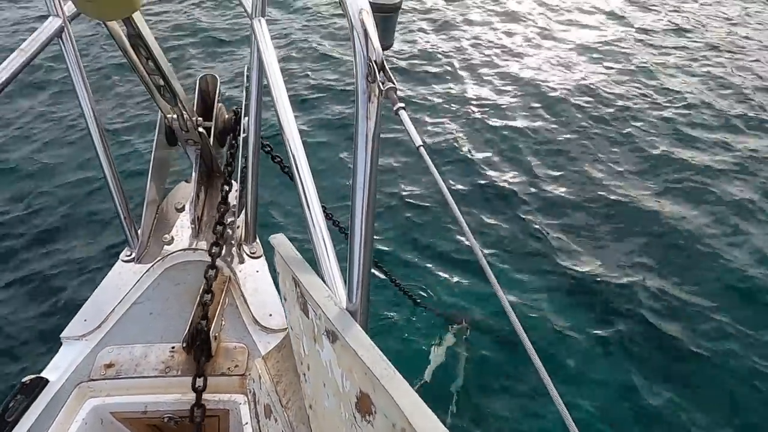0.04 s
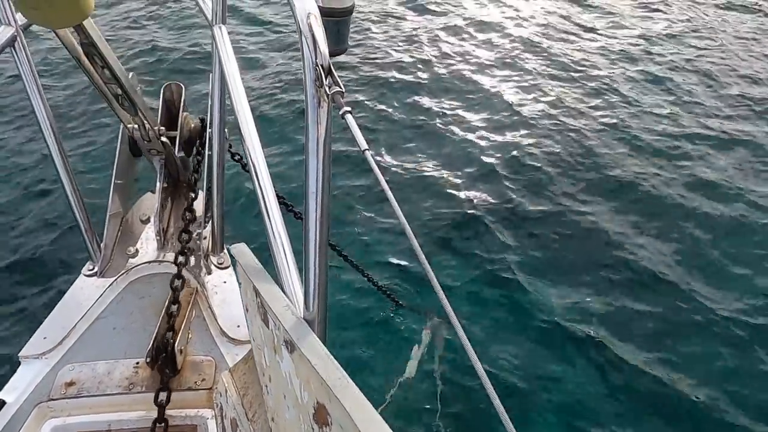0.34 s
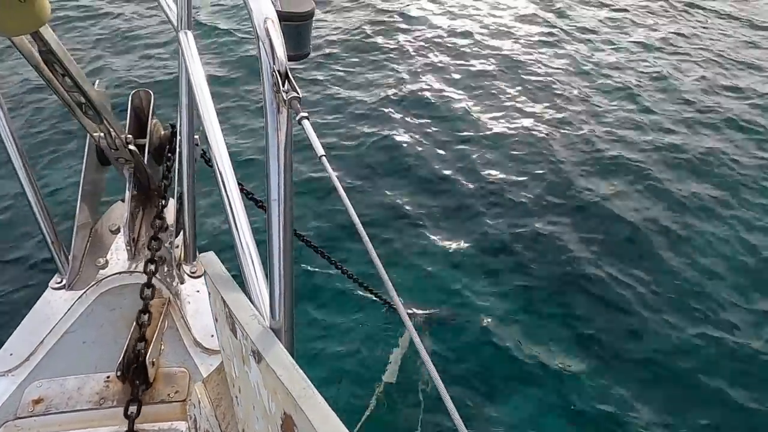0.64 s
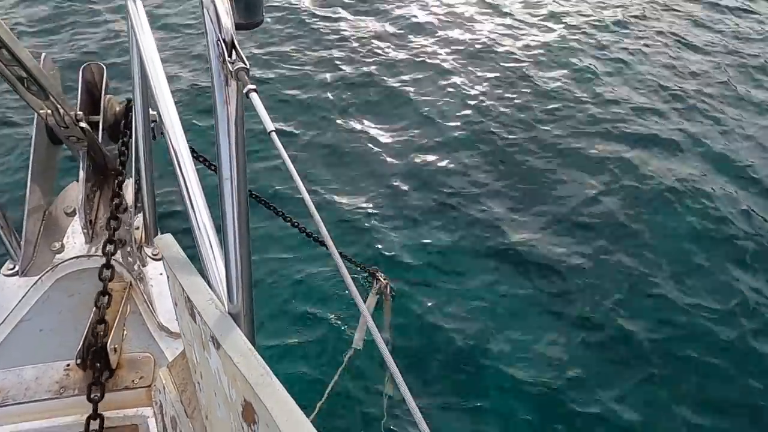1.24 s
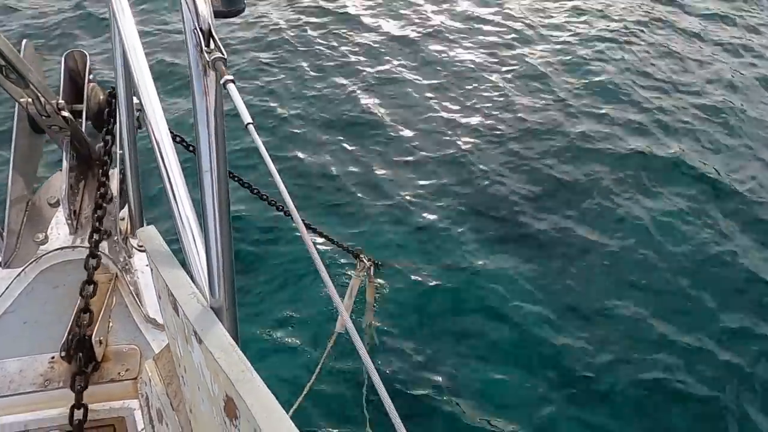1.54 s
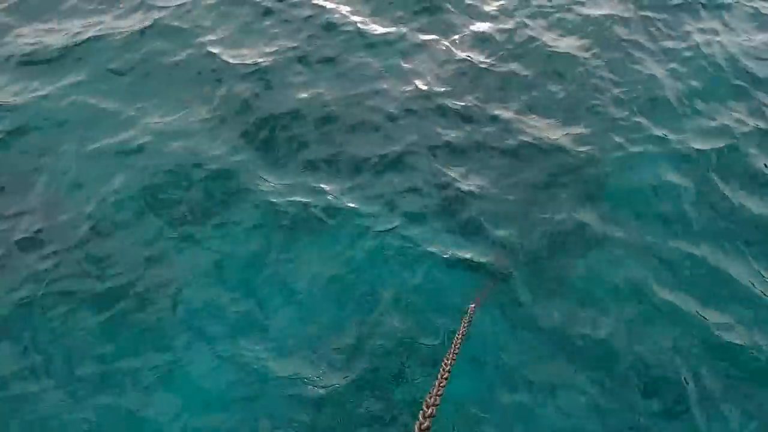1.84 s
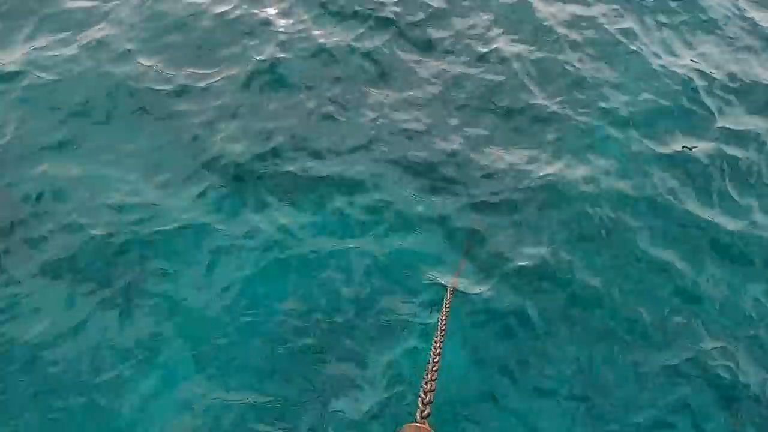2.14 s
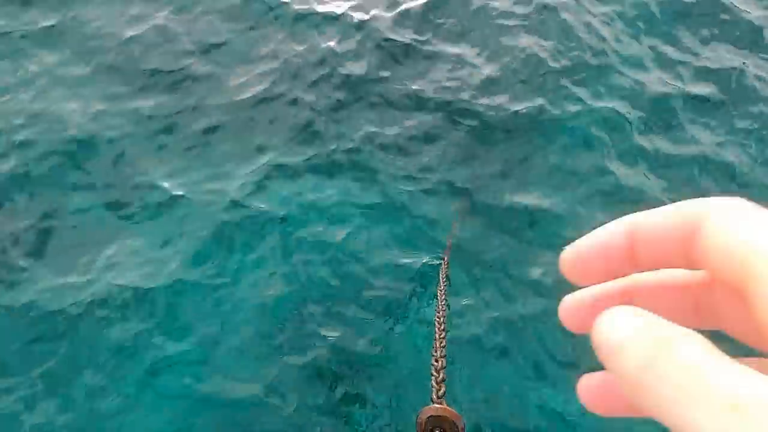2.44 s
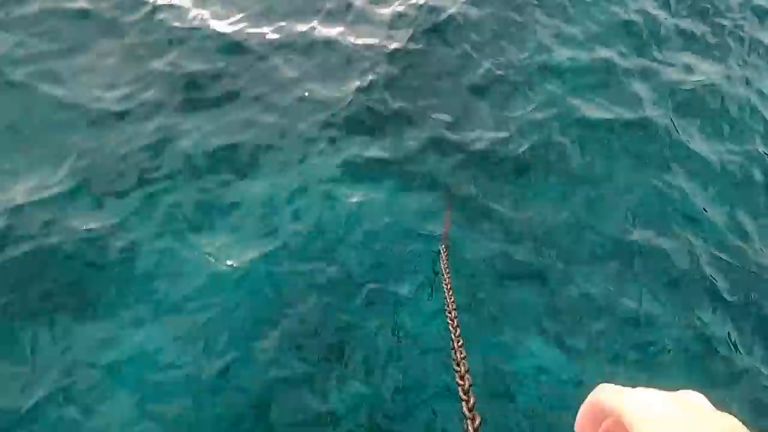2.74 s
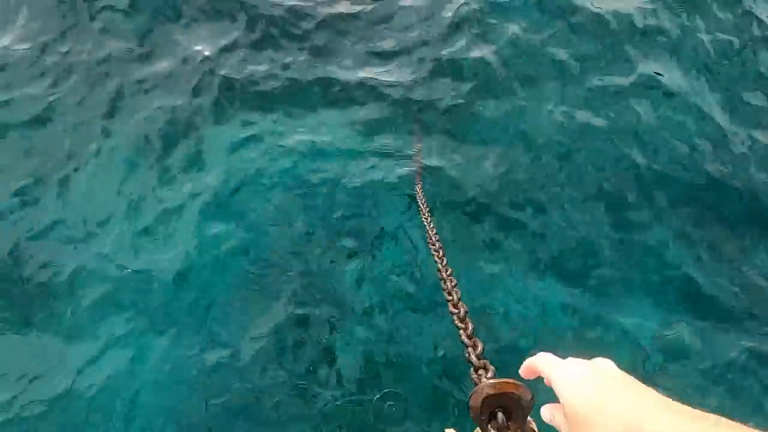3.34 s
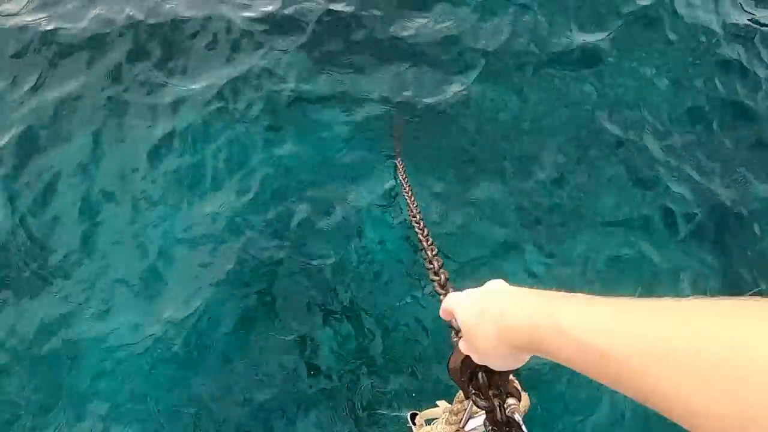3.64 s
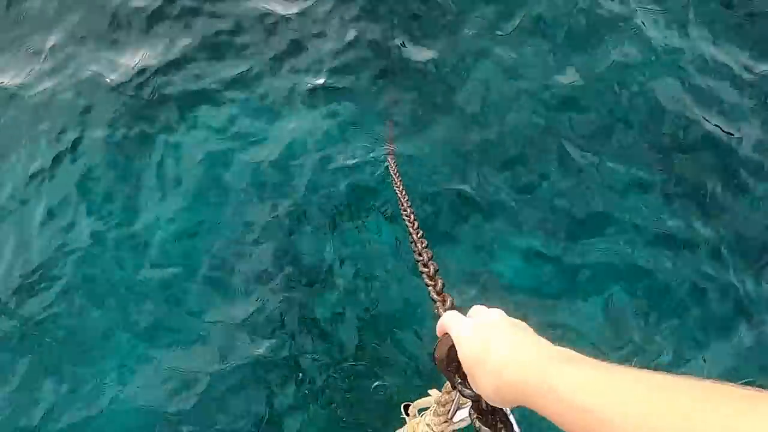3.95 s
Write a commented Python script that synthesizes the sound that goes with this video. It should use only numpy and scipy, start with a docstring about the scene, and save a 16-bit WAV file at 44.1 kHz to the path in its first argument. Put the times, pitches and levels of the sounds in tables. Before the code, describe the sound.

Anchor chain clatters through an electric windlass close by on a boat's bow, about six clinks a second, with knocks, deck thuds and rattling over the motor's hum. From about 1 second it fades out. At 1.8 seconds a click cuts to low wind gusts on the microphone, strongest near 2.4 and 3.5 seconds. Underneath, water softly laps and drips until 4 seconds, with a few faint chain tinkles.

```python
"""On a boat's bow, close to an electric windlass hauling anchor chain. Each link clinks on the roller,
knocks in the chain wheel and thuds through the deck, over the motor's hum and a loose rattle.
From about 1 s the hauling fades out. At 1.845 s a second scene cuts in with a click: wind buffets the
microphone while water laps and drips at the bow and the hanging chain tinkles faintly."""
import sys
import numpy as np
from scipy import signal
from scipy.fft import rfft, irfft
from scipy.io import wavfile

SR = 44100
rng = np.random.default_rng(int(sys.argv[2]) if len(sys.argv) > 2 else 0)


def file_out(sig):
    """Save sig as 16-bit WAV at sys.argv[1]."""
    # one column per channel
    cols = np.atleast_2d(sig).T
    # limit, then scale
    lim = np.clip(cols, -1, 1)
    pcm = np.round(lim * 32767).astype(np.int16)
    wavfile.write(sys.argv[1], SR, pcm)


N = 176400
FADE_FROM_S, CUT_S = 1.027, 1.845

# Wind on the microphone. Each row: time in seconds, deep rumble level in dB, mean flutter level in dB.
GUSTS = [(1.85, -36, -44), (1.88, -27.5, -44.5), (1.96, -26.5, -49), (2.009, -42.5, -48),
         (2.14, -38.5, -52), (2.19, -44, -57), (2.241, -33, -32.5), (2.26, -35.5, -60), (2.38, -22, -26.5),
         (2.47, -26.5, -34.5), (2.63, -34.5, -34), (2.66, -28, -36), (2.88, -30.5, -48.5),
         (2.93, -28, -34.5), (3.11, -34, -59), (3.17, -29.5, -41.5), (3.33, -30, -27), (3.49, -21, -28.5),
         (3.55, -26, -36), (3.65, -38.5, -67), (3.879, -29, -33.5), (3.9, -36, -56), (4.0, -41.5, -67)]
# Colours of the noises and blows. Each row: frequency in Hz, relative spectral level in dB.
WIND_DEEP_COLOUR = [(15, -12.5), (30, -2), (55, -0.5), (100, -3.5), (140, -11.5), (200, -14.5), (800, -84),
                    (15000, -130)]
WIND_FLUTTER_COLOUR = [(70, -11), (130, 0), (190, -2.5), (280, -12), (420, -21.5), (700, -32),
                       (1500, -66.5), (9000, -88)]
WAVELET_COLOUR = [(180, -12.5), (300, -0.5), (515, -1), (841, -9), (1020, -8.5), (2970, -23), (6840, -37.5),
                  (8600, -42.5), (11000, -63), (15000, -75)]
SPLASH_COLOUR = [(400, -13), (1000, 7), (1900, 1.5), (3000, -1), (5000, -12.5), (8500, -21), (11000, -30.5),
                 (15000, -50)]
SLAP_COLOUR = [(200, -11.5), (700, 13), (1300, 8.5), (2500, -8), (5000, -15.5), (9000, -45), (14000, -70)]
TICK_COLOUR = [(1500, -1), (3500, 1.5), (6000, 2.5), (8300, -3), (9500, -12), (14000, -30)]
HULL_COLOUR = [(20, -24), (40, -3.5), (70, -4.5), (95, -3.5), (135, -2), (190, -12), (280, -12.5),
               (500, -23), (3000, -82), (15000, -130)]
RATTLE_COLOUR = [(200, -9.5), (320, 1), (390, -14), (450, 1), (515, -2), (600, 2.5), (720, 4), (880, -3.5),
                 (1200, 1), (1550, -6.5), (2100, -7), (2800, -9), (3600, -12), (4700, -27), (6000, -19),
                 (7600, -28.5), (8700, -29), (9400, -41.5), (10300, -33), (13000, -45), (15500, -56)]
THUD_COLOUR = [(60, 2), (250, 1), (600, 0.5), (900, -5), (1300, -2), (2200, -24), (5000, -29),
               (9000, -60.5), (15000, -86.5)]
KNOCK_COLOUR = [(100, -2), (400, -2), (1200, 3.5), (2000, 2.5), (2900, 0), (4700, -5), (6200, -22.5),
                (7700, -22.5), (8800, -22), (9500, -41.5), (12500, -44), (15500, -51.5)]
CRACK_COLOUR = [(1000, -17), (2600, -7.5), (3500, -4), (4900, -1), (6200, -14), (7700, -21.5), (8800, -24),
                (9500, -30), (12000, -39.5), (15500, -47.5)]
SCATTER_COLOUR = [(100, -33), (1000, -31.5), (4000, -2.5), (8000, 9), (13000, 15.5)]

# Splashes at the bow. Each row: time of the peak in seconds, half length in seconds, level in dB.
BOW_SPLASHES = [(2.073, 0.11, -56.5), (2.527, 0.12, -56), (2.837, 0.05, -57), (3.219, 0.043, -47),
                (3.283, 0.017, -62), (3.587, 0.14, -59), (3.842, .03, -62)]
# Drips and bubbles. Each row: start in seconds, pitch in Hz, level in dB, t60 in seconds.
WATER_DRIPS = [(1.948, 1690, -37.5, 0.042), (2.178, 787, -39, 0.16), (2.232, 318, -28.5, 0.039),
               (2.287, 1940, -48.5, 0.058), (3.195, 1845, -41.5, 0.068), (3.25, 1626, -45, 0.055),
               (3.43, 1580, -46, 0.062)]
# Water slapping and ticking at the bow. Each row: start in seconds, level in dB.
BOW_SLAPS = [(2.232, -49.5), (2.304, -37), (2.37, -39.5), (2.386, -42), (3.236, -39), (3.486, -38)]
WATER_TICKS = [(2.309, -59), (2.369, -62.5), (2.513, -52), (2.521, -54), (2.828, -60), (3.102, -49.5),
               (3.11, -59), (3.416, -64), (3.432, -65), (3.788, -62)]
# Hanging links touching. Each row: start in seconds, level in dB, ring pitch in Hz.
CHAIN_TINKLES = [(1.983, -59.5, 4230), (2.52, -51.5, 5030), (2.715, -64, 3900), (2.727, -69, 5700),
                 (2.83, -60, 4360), (2.868, -67, 4100)]

# Modes of the parts that ring. Each row: frequency in Hz, relative level in dB, t60 in seconds.
SLACK_CHAIN_MODES = [(3450, -9.5, 0.094), (3740, -0.5, 0.058), (4320, -9, .08), (4720, -4, 0.11),
                     (5394, -11, 0.05), (6260, -16, .07), (7030, -8, 0.088), (8800, -13.5, .07),
                     (9600, -17, .06), (12600, -29, .06)]
DECK_MODES = [(151, 4, 0.15), (256.8, -4.5, 0.18), (310.7, -7, 0.18), (362, -0.5, 0.036), (423, 0.5, 0.14),
              (473, -6, 0.17), (566.7, -1.5, 0.094), (747, -9, 0.082)]
HOUSING_MODES = [(572, -1, .14), (714, -3, .12), (936, -3, .16), (990, -4, .1), (1162, 0, .14),
                 (1308, -2, .09), (1534, -3, .11), (1794, -5, .09), (2135, -6, .1), (2416, -6, .1),
                 (3430, -5, .14), (4205, -3, .22), (4666, -9, .13), (5395, -13, .16)]
WHEEL_MODES = [(3180, -4, .1), (4160, 5.5, 0.057), (4360, -11.5, .1), (4640, -6.5, 0.071),
               (5330, -7.5, 0.058), (7060, -12, 0.061), (8802, -28.5, 0.063)]
# Modes of one link. Each row: ratio to the ring pitch, relative level in dB, t60 in seconds.
LINK_MODES = [(.79, -13, 0.035), (0.943, -3.5, 0.071), (0.999, 2, 0.062), (1.062, -4, 0.05),
              (1.18, -4, .04), (1.31, -8, .03), (1.45, -14, .025), (1.66, -20, .025)]
# The chain's blows on deck and chain wheel. Each row: start in seconds, relative level in dB.
DECK_THUDS = [(0.076, -19), (0.202, -20.5), (.236, -21), (0.391, -18.5), (.545, -16), (.697, -19.5),
              (0.852, -17.5), (1.008, -22.5), (1.156, -21), (1.238, -19.5), (1.29, -24), (1.317, -24.5),
              (1.452, -19.5), (1.479, -19.5), (1.613, -22)]
WHEEL_PINGS = [(.083, -27), (.245, -25.5), (.398, -38.5), (.543, -34), (0.699, -26), (.856, -51.5),
               (1.013, -45), (1.171, -39), (1.334, -23.5), (1.486, -30.5)]
WHEEL_KNOCKS = [(.047, -17.5), (0.078, -27), (.130, -25.5), (0.202, -17.5), (.232, -32), (0.287, -21.5),
                (0.36, -17.5), (0.44, -23), (0.514, -21.5), (0.539, -26), (0.598, -17.5), (0.671, -22),
                (.696, -21.5), (0.751, -20), (.826, -19.5), (.903, -22), (0.921, -24), (.978, -19.5),
                (1.056, -20.5), (1.131, -21), (1.210, -19), (1.289, -21.5), (1.316, -23.5), (1.373, -20.5),
                (1.45, -20.5), (1.533, -23), (1.609, -21.5), (1.688, -22), (1.706, -26), (1.764, -19.5)]
# Links striking the bow roller. Each row: start in seconds, relative level in dB, ring pitch in Hz,
# level of the crack in dB relative to that blow.
ROLLER_CLINKS = [(0.02, -20.5, 3320, -12.5), (0.024, -10, 3460, -11), (0.172, -17, 3630, -9.5),
                 (0.317, -12, 3425, -16), (.324, -12.5, 3370, -10.5), (0.469, -14.5, 3700, -9.5),
                 (0.484, -15.5, 3840, -2), (0.632, -14.5, 3680, -6.5), (.647, -16, 3713, 0.5),
                 (0.778, -26.5, 3790, 2.5), (0.797, -16.5, 3325, -7), (.941, -19, 3290, -7.5),
                 (0.953, -15, 3300, -1.5), (1.094, -22.5, 3835, -2), (1.107, -15.5, 3660, -1),
                 (1.257, -12.5, 3334, -5.5), (1.409, -10.5, 3390, -4.5), (1.428, -23.5, 4090, -1),
                 (1.563, -21.5, 3770, 5.5), (1.578, -15, 3560, -3), (1.725, -14.5, 3570, -1)]


def undb(db):
    """Decibels to gain."""
    return 10 ** (np.asarray(db) / 20)


def unit(x):
    """Scale to rms 1."""
    return x / np.sqrt(np.mean(x ** 2) + 1e-20)


def noise(colour, size=N):
    """Noise of rms 1 with the given colour."""
    hz, db = np.array(colour, float).T
    f = np.maximum(np.arange(size // 2 + 1) * SR / size, 1)
    gain = undb(np.interp(np.log(f), np.log(hz), db)) * np.minimum(f / hz[0], 1) ** 2
    return unit(irfft(gain * np.exp(2j * np.pi * rng.random(len(f))), size))


def walk(rate):
    """A random curve of rms 1 that turns rate times a second."""
    return unit(np.interp(np.arange(N) * rate / SR, np.arange(N // 20), rng.standard_normal(N // 20)))


def decay(t60, size=12000):
    """Exponential die-away, 60 dB down after t60 seconds."""
    return np.exp(-np.log(1000) * np.arange(size) / SR / t60)


def burst(colour, t60, size=12000):
    """Quickly dying noise of the given colour, starting near rms 1."""
    hz, db = np.array(colour, float).T
    f = np.maximum(np.arange(size // 2 + 1) * SR / size, 1)
    gain = undb(np.interp(np.log(f), np.log(hz), db)) * np.minimum(f / hz[0], 1)
    cepstrum = irfft(np.log(gain))
    cepstrum[size // 2:] = 0  # minimum phase keeps the attack sharp
    envelope = decay(t60, size)
    y = irfft(rfft(rng.standard_normal(size) * envelope) * np.exp(2 * rfft(cepstrum)))
    return y * np.linalg.norm(envelope) / np.linalg.norm(y)


def ring(modes, size=12000):
    """Decaying (Hz, dB, t60) modes that start near rms 1."""
    t = np.arange(size) / SR
    y = sum(rng.choice([-1, 1]) * undb(db) * np.sin(2 * np.pi * hz * t) * decay(t60, size)
            for hz, db, t60 in modes)
    start_rms = np.sqrt(sum(undb(db) ** 2 for _, db, _ in modes) / 2)
    return y * (1 - decay(0.001, size)) / start_rms


def add(out, s, sound):
    """Mix a sound in at s seconds."""
    i = min(max(int(s * SR), 0), len(out))
    out[i:i + len(sound)] += sound[:len(out) - i]


def chatter(body, gap_s, count=4):
    """One blow followed by a few weaker rebounds, about gap_s apart."""
    order = np.arange(count)
    delays = (order + rng.uniform(-0.61, 0.58, count) * (order > 0)) * gap_s
    gains = 0.4 ** order * rng.choice([-1, 1], count)
    out = np.zeros(len(body))
    for s, gain in zip(delays, gains):
        add(out, s, gain * body)
    return out * np.linalg.norm(body) / np.linalg.norm(out)


def detuned(hz, spread):
    """A pitch off by a random fraction."""
    return hz * (1 + spread * rng.standard_normal())


def link_ring(hz):
    """The ring of one link; no two are quite alike."""
    return ring([(detuned(hz * ratio, 0.0089), db, t60) for ratio, db, t60 in LINK_MODES])


def water(t):
    """Down at the waterline, a soft wash of wavelets with splashes, drips, slaps and small ticks."""
    out = noise(WAVELET_COLOUR) * undb(-53.5 + 2.2 * walk(6.05) + 2 * walk(90))
    spray = unit(noise(SPLASH_COLOUR) * undb(3.1 * walk(250)))
    for s, half_s, db in BOW_SPLASHES:
        out += spray * undb(db) * np.exp(-((t - s) / half_s) ** 2)
    for s, hz, db, t60 in WATER_DRIPS:
        add(out, s, undb(db) * ring([(hz, 0, t60)]) * (1 - decay(0.015)))
    for s, db in BOW_SLAPS:
        add(out, s, undb(db) * burst(SLAP_COLOUR, t60=0.06))
    for s, db in WATER_TICKS:
        add(out, s, undb(db) * burst(TICK_COLOUR, t60=0.058))
    return out


def gurgle(start_s=3.185, length_s=0.068, centre_hz=1782, octaves=0.6, count=12):
    """A quick cluster of small bubbles at the bow, each ringing at its own pitch."""
    out = np.zeros(N)
    for when, pitch in rng.random((count, 2)):
        hz = centre_hz * 2 ** (octaves * (pitch - 0.5))
        bubble = ring([(hz, 0, 0.04)]) * (1 - decay(0.0089))
        add(out, start_s + when * length_s, undb(-46) * bubble)
    return out


def tinkles():
    """Links of the hanging chain touch lightly."""
    out = np.zeros(N)
    for s, db, hz in CHAIN_TINKLES:
        add(out, s, undb(db) * link_ring(hz))
    return out


def wind(t):
    """Gusts right on the microphone: a deep rumble and a quicker flutter."""
    s, deep_db, flutter_db = np.array(GUSTS).T
    deep = noise(WIND_DEEP_COLOUR) * undb(np.interp(t, s, deep_db))
    flutter = noise(WIND_FLUTTER_COLOUR) * undb(np.interp(t, s, flutter_db) + 4.85 * walk(40))
    return deep + flutter


def cut_click():
    """A click as the scene changes."""
    out = np.zeros(N)
    add(out, CUT_S, undb(-29.5) * decay(0.04))
    return out


def motor(t, start_hz=145, sag_hz_per_s=4, wobble=0.11, throb_db=5):
    """The loaded motor hums unsteadily over the rumble of the hull; both ease off late in the haul."""
    hz = (start_hz - sag_hz_per_s * t) * (1 + wobble * walk(39.27))
    throb = undb(throb_db * np.clip(walk(30), -2, 1))
    hum = unit(np.sin(2 * np.pi * np.cumsum(hz) / SR) * throb)
    easing = undb(np.interp(t, [1.3, 1.5], [0, -4]))
    return (undb(-28) * hum + undb(-23.5) * noise(HULL_COLOUR)) * easing


def rattle(t, links=8, taps_per_s=2200, settle_s=0.05):
    """Loose links tap the housing and jingle; each knock in the wheel briefly shakes them harder."""
    shaken = np.max([(t > s) * np.exp(-((t - s) / settle_s) ** 2) for s, _ in WHEEL_KNOCKS], axis=0)
    clatter, jingle = np.zeros(N), np.zeros(N)
    for _ in range(links):
        touches = rng.random(N) < taps_per_s / links / SR
        strength = undb(2.5 * np.clip(rng.standard_normal(N), -2, 2))
        taps = touches * strength * rng.choice([-1, 1], N) * (1 + 2.2 * shaken)
        modes = [(detuned(hz, 0.018), db, t60) for hz, db, t60 in SLACK_CHAIN_MODES]
        housing_tap = burst(RATTLE_COLOUR, t60=0.038) + undb(-17) * ring(HOUSING_MODES)
        clatter += signal.fftconvolve(taps, housing_tap)[:N]
        jingle += signal.fftconvolve(taps, ring(modes))[:N]
    return undb(-31) * unit(clatter) + undb(-49) * unit(jingle)


def thuds():
    """The chain's weight drops link by link and shakes the deck underfoot."""
    out = np.zeros(N)
    deck = undb(0.5) * ring(DECK_MODES)
    for s, db in DECK_THUDS:
        add(out, s, undb(db) * chatter(deck + burst(THUD_COLOUR, t60=0.08), gap_s=0.007))
    return out


def pings():
    """The steel chain wheel rings on as a link snaps free."""
    out = np.zeros(N)
    for s, db in WHEEL_PINGS:
        add(out, s, undb(db) * ring(WHEEL_MODES))
    return out


def knocks():
    """Links seat in the chain wheel and leave it: a hard contact, then a short chatter in the housing."""
    out = np.zeros(N)
    housing = undb(-15) * ring(HOUSING_MODES)
    for s, db in WHEEL_KNOCKS:
        blow = housing + burst(KNOCK_COLOUR, t60=0.03)
        add(out, s, undb(db + 2) * chatter(blow, gap_s=0.004, count=3))
    return out


def clinks(link_db=-4, boom_hz=142.8, jostle_s=0.011):
    """Close by, links crack on the roller, ring and jostle the next link; the bow booms under them."""
    out = np.zeros(N)
    for s, db, hz, crack_db in ROLLER_CLINKS:
        boom = undb(-3.5) * ring([(boom_hz, 0, 0.15)]) * (1 - decay(0.03))
        crack = undb(crack_db) * chatter(burst(CRACK_COLOUR, t60=0.041), gap_s=0.003)
        add(out, s, undb(db) * (undb(link_db) * link_ring(hz) + boom + crack))
        neighbour = undb(link_db - 11) * link_ring(detuned(hz, 0.06))
        add(out, s + jostle_s * rng.uniform(0.54, 1), undb(db) * neighbour)
    return out


def scene():
    """The hauling fades, then wind and water cut in. Faint scattered treble differs left and right."""
    t = np.arange(N) / SR
    hauling = clinks() + knocks() + pings() + thuds() + rattle(t) + motor(t)
    ambience = wind(t) + water(t) + gurgle() + tinkles()
    fade_out = np.clip((CUT_S - t) / (CUT_S - FADE_FROM_S), 0, 1) ** 0.85
    cut_in = np.clip((t - CUT_S) / 0.00063, 0, 1)
    mid = fade_out * hauling + cut_in * ambience + cut_click()
    scatter = burst(SCATTER_COLOUR, t60=0.014)
    side = undb(-15) * signal.fftconvolve(mid, scatter / np.linalg.norm(scatter))[:N]
    return np.array([mid + side, mid - side])


def record(dry):
    """The recorder cuts the top above 15.7 kHz."""
    return signal.sosfilt(signal.ellip(8, 0.2, 70, 15700, fs=SR, output="sos"), dry)


dry = scene()
out = record(dry)
file_out(out)
```